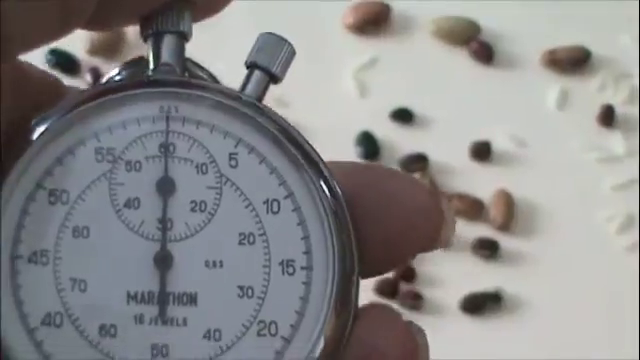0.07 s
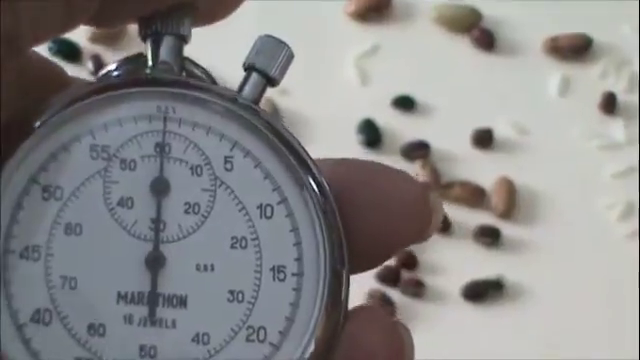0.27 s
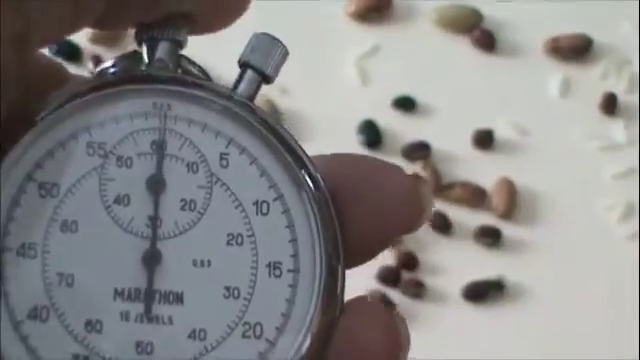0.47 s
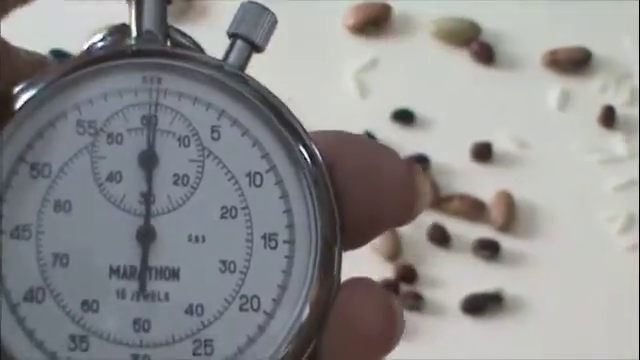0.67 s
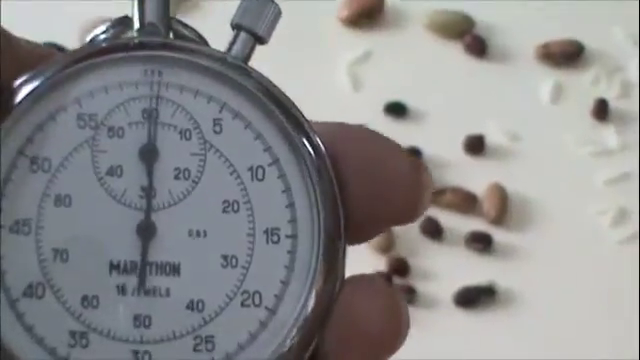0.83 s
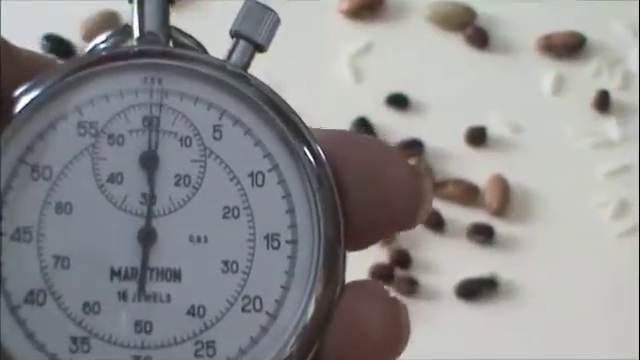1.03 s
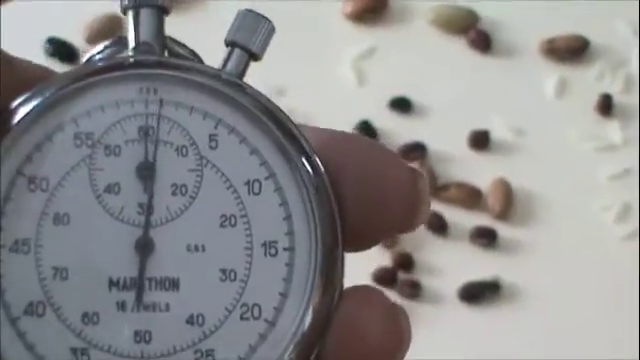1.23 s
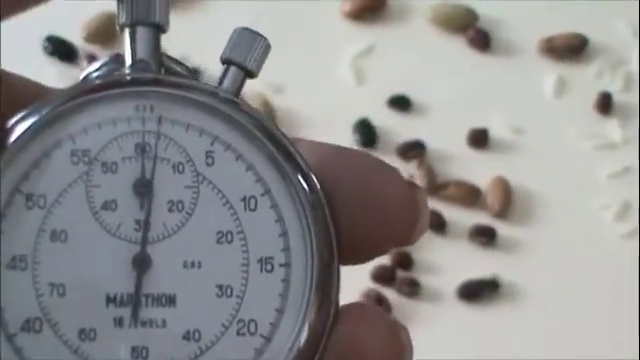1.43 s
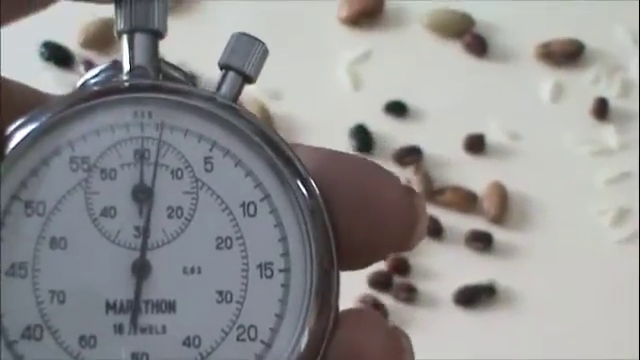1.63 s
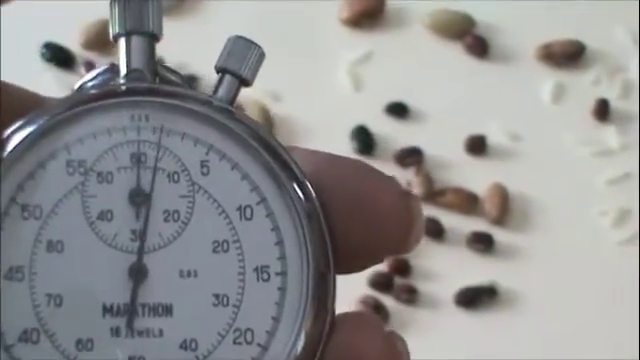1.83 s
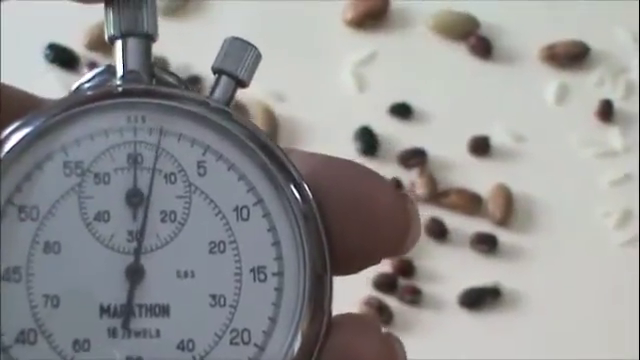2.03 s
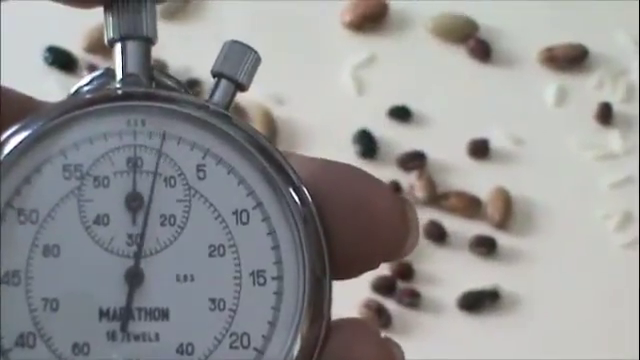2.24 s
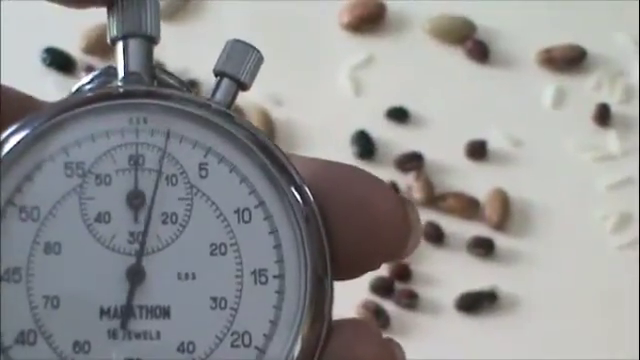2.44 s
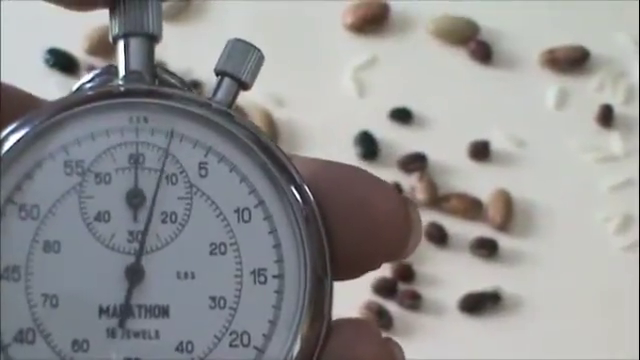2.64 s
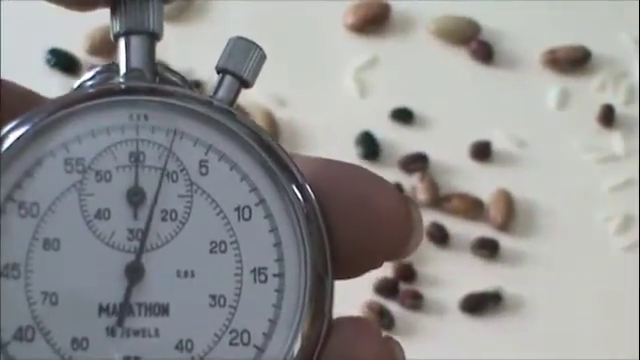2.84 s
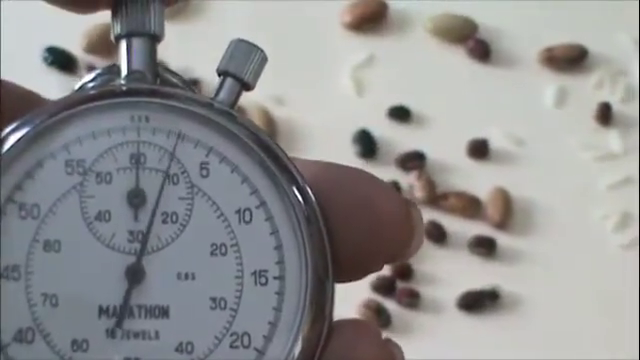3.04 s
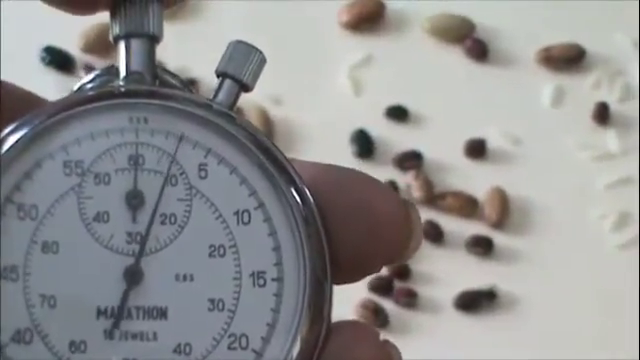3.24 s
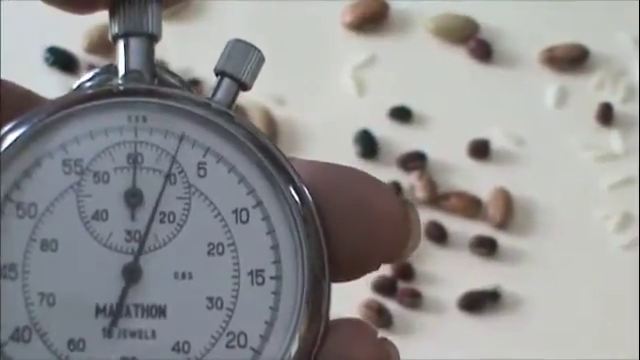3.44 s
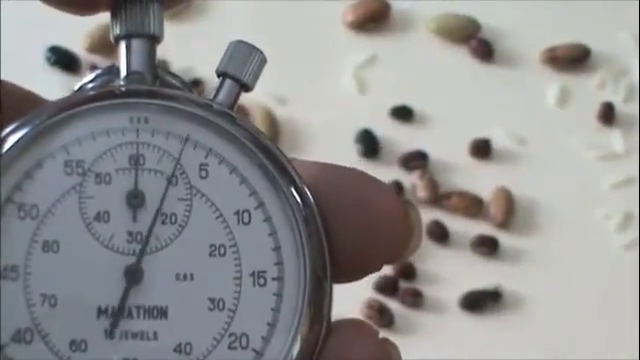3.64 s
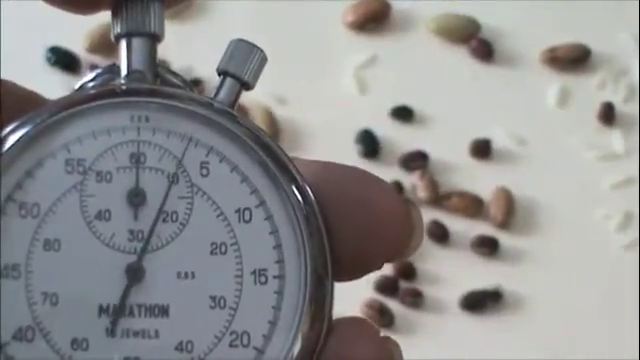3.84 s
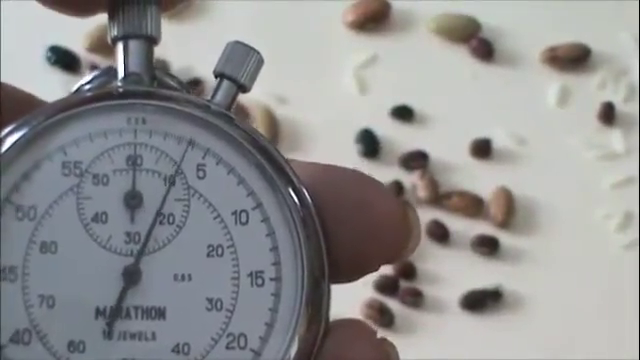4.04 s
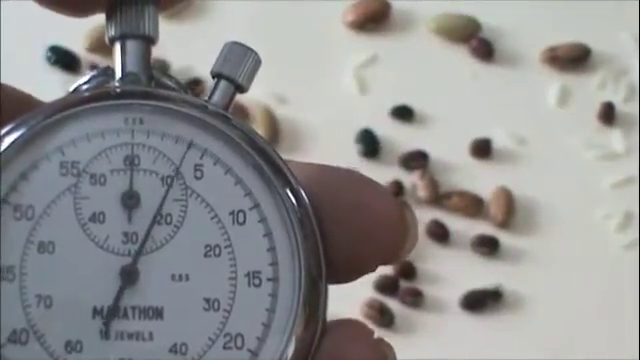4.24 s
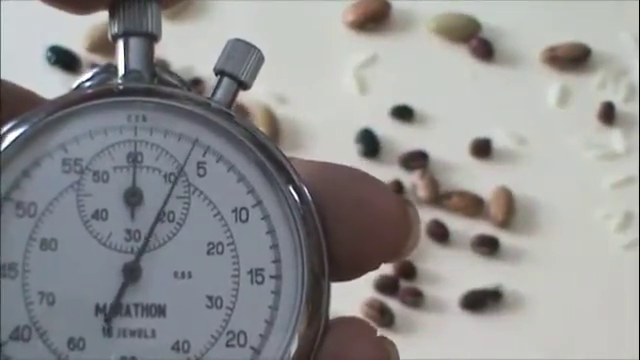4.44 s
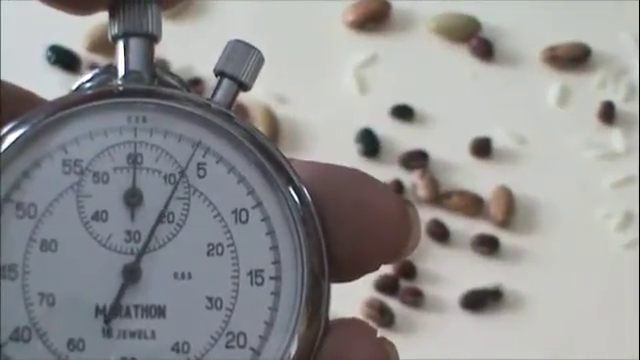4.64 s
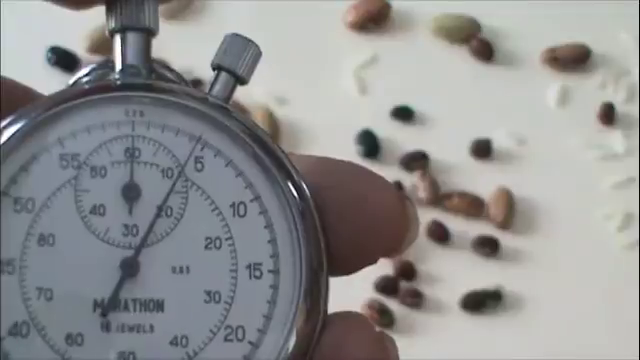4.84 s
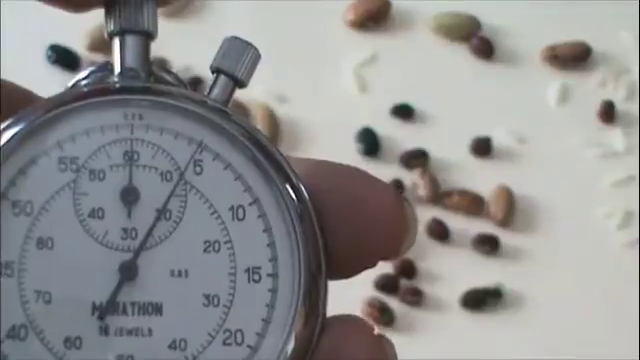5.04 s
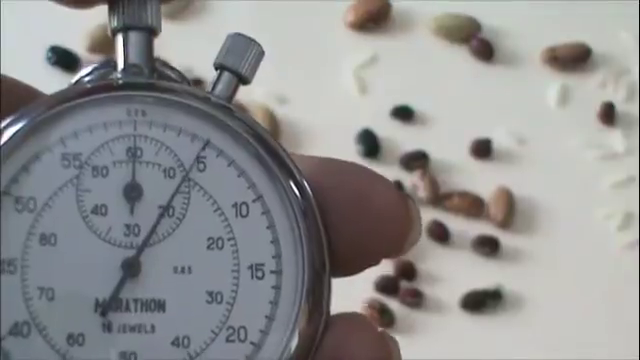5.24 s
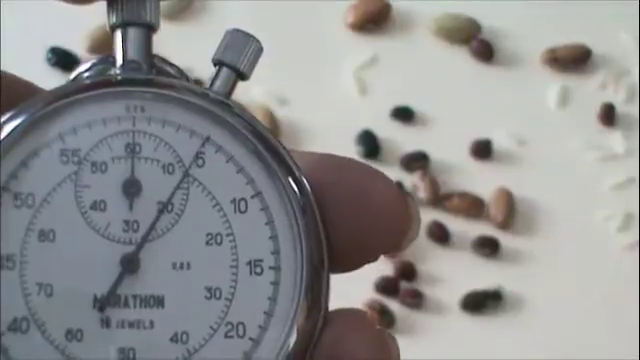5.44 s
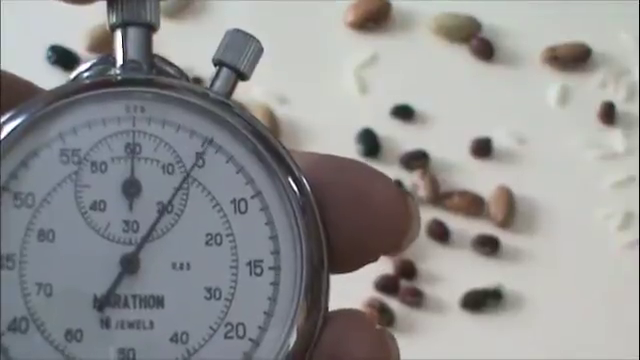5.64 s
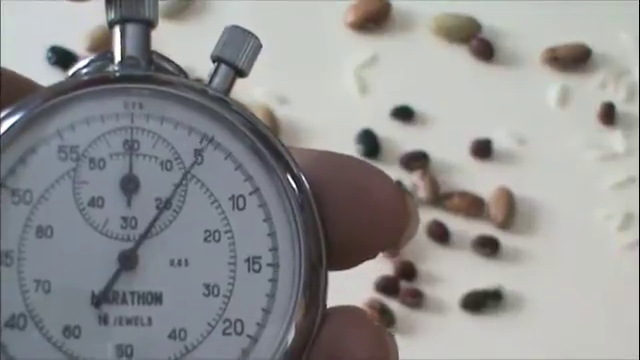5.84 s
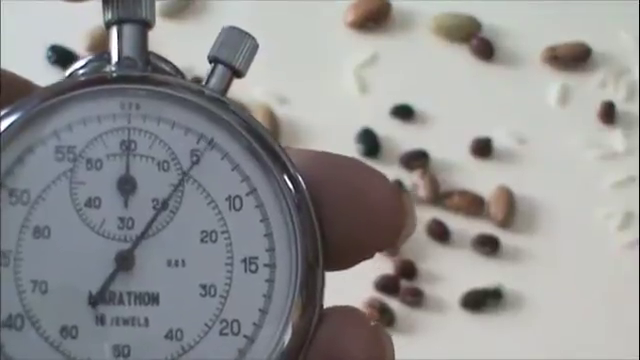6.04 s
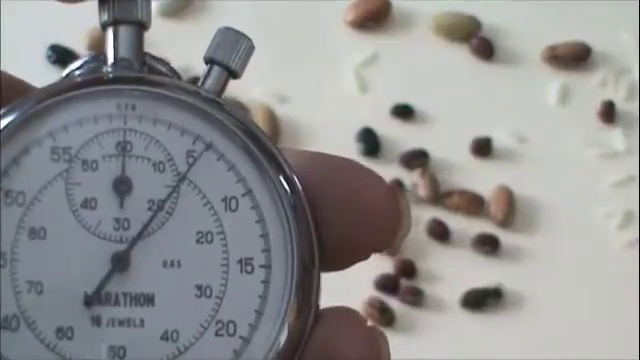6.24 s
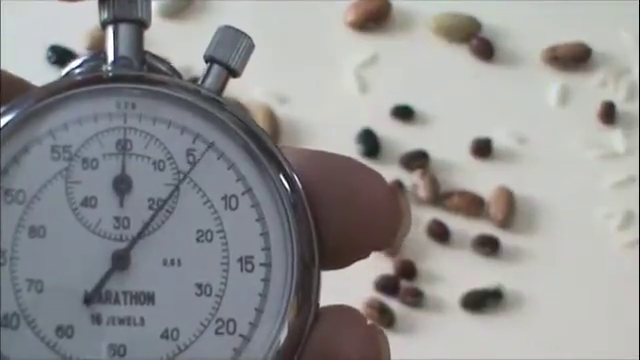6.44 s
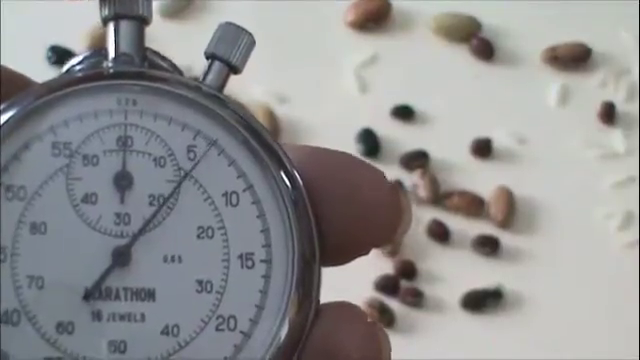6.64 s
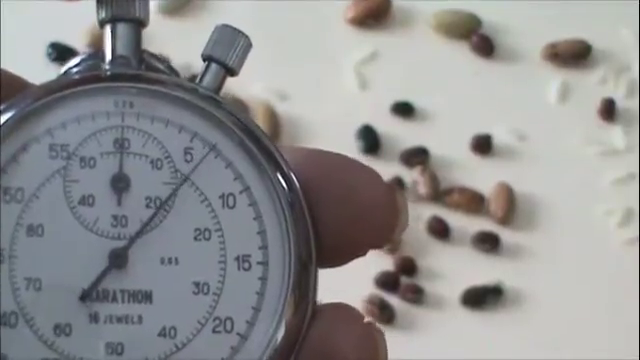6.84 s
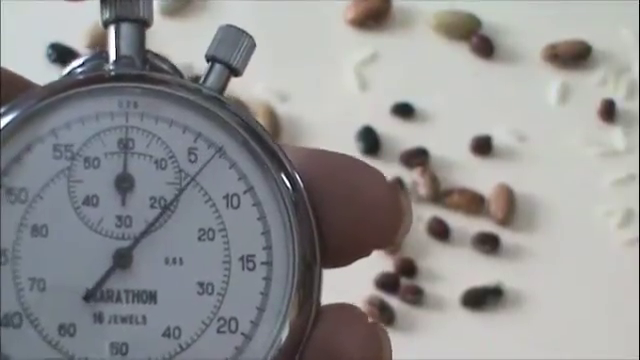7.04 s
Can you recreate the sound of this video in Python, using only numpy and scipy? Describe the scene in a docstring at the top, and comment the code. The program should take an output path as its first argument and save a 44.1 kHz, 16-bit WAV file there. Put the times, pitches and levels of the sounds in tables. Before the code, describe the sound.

In a quiet room, a faint focus motor buzzes briefly, then a hand presses a stopwatch's crown close to the microphone: hard metallic snaps with a bright spring ring. The mechanism starts and ticks on evenly, crisp, thin and rapid, in weak-strong pairs. Smaller clicks and finger slips continue until about two and a half seconds. Low appliance hum, a far engine and distant tyre noise lie underneath.

```python
"""Stopwatch started in the hand

A mechanical stopwatch is started close to a camera: the crown clicks (noise bursts ringing the case),
the springs ring (dying sines and shimmering noise), then the escapement ticks five times a second,
weak and strong in turn (bursts through resonances). The camera's focus motor steps faintly at first.
Appliances hum (wavering sines), a far engine drones (a gliding sine), tyres swell in the room's noise."""
import sys
import numpy as np
from scipy import signal
from scipy.fft import rfft, irfft, next_fast_len
from scipy.io import wavfile

SR = 44100
rng = np.random.default_rng(int(sys.argv[2]) if len(sys.argv) > 2 else 0)


def unload_audio(sound):
    """Save the sound as a 16-bit wav file, at the path given as the first command line argument."""
    columns = np.transpose(np.atleast_2d(sound))
    # keep every value between -1 and 1, then stretch to whole-number steps
    steps = np.round(np.clip(columns, -1, 1) * 32767)
    wavfile.write(sys.argv[1], SR, steps.astype(np.int16))


N = 313234
TIME = np.arange(N) / SR
TAPS = 4096  # length of the resonance and colour filters
BINS = np.fft.rfftfreq(TAPS, 1 / SR)

# resonances of the case, damped by the hand: centre_hz, width_hz, level_db
CASE_MODES = [(650, 170, -22), (1270, 140, -15.5), (2120, 1000, -10), (2767, 320, 1.5), (3500, 1300, -15.5),
              (4813, 260, 1), (6360, 810, -10.5), (7800, 860, -4), (8900, 390, 2), (9680, 400, 3.5),
              (11400, 970, -4.5), (13400, 990, -12), (15200, 1500, -19)]


def amp(db):
    """Decibels to gain."""
    return 10 ** (np.asarray(db) / 20)


def evened(x):
    """Scales to rms 1."""
    return x / np.sqrt(np.mean(x ** 2) + 1e-30)


def read_spectrum(points, hz):
    """Reads a spectrum table in dB on a log-frequency axis."""
    points_hz, value_db = np.transpose(points)
    return np.interp(np.log(hz + 1), np.log(points_hz), value_db)


def add(mix, start_s, sound):
    """Mixes a sound in at its start time."""
    part = mix[max(round(start_s * SR), 0):][:len(sound)]
    part += sound[:len(part)]


def drift(rate_hz, size=256):
    """Slow random wander of about rms 1: noise with its fast changes filtered away."""
    hz = np.fft.rfftfreq(size, TIME[-1] / size)
    spectrum = rfft(rng.standard_normal(size)) / (1 + (hz / rate_hz) ** 4)
    return np.interp(TIME, np.linspace(0, TIME[-1], size), evened(irfft(spectrum)))


def causal(gain):
    """The sharpest (minimum-phase) impulse response that has this gain at each frequency."""
    log_gain = np.log(np.maximum(gain, gain.max() * 1e-5))
    circle = np.concatenate([log_gain, log_gain[-2:0:-1]])
    return np.fft.ifft(np.exp(np.conj(signal.hilbert(circle)))).real


def body(modes):
    """Gain of a set of resonances with steep skirts."""
    power = np.zeros(len(BINS))
    for hz, width_hz, db in modes:
        detune = (BINS ** 2 - hz ** 2) / ((BINS + 1) * width_hz)
        power += amp(db) ** 2 / (1 + detune ** 2) ** 1.28
    return np.sqrt(power)


def chatter(decay_s, size=1024):
    """A metal contact swells and chatters briefly: an even-spectrum burst of energy 1."""
    u = (np.arange(size) + 1) / SR / decay_s
    fade = (1 - np.exp(-3 * u)) * np.exp(-u)
    burst = rng.standard_normal(size)
    for _ in range(5):  # flatten the spectrum and reshape the fade in turn
        phase = np.angle(rfft(burst * fade))
        burst = irfft(np.exp(1j * phase)) * np.sqrt(fade)
    return burst / np.linalg.norm(burst)


def tail(colour, t60, side_db):
    """A dense dying response for two channels: fading noise, of energy 1 before its colour."""
    t = np.arange(SR) / SR
    fade = amp(-60 * t / t60) * (1 - np.exp(-t / 0.00042))
    noise = rng.standard_normal((2, SR)) * fade
    noise /= np.linalg.norm(noise, axis=1, keepdims=True)
    colour_filter = causal(amp(read_spectrum(colour, BINS)))
    mid, side = signal.fftconvolve(noise, colour_filter[None], axes=1)[:, :SR]
    return np.array([mid + amp(side_db) * side, mid - amp(side_db) * side])


def through(x, response):
    """Plays a mono sound through a two-channel response."""
    size = next_fast_len(N + SR, True)
    return irfft(rfft(x, size) * rfft(response, size), size)[:, :N]


def air(tyre_hz=960, tyre_width_hz=110):
    """Steady room noise, narrow in the bass and wide in the middle, with far tyres swelling in it."""
    # room air and microphone hiss: pitch_hz, density_db (per Hz)
    air_colour = [(20, -103), (60, -92.5), (80, -96), (190, -88), (340, -87.5), (520, -93.5), (1000, -96),
                  (1250, -99.5), (1650, -101.5), (2200, -106), (4200, -108.5), (6200, -106.5), (7600, -109),
                  (9200, -106.4), (11500, -109.3), (16000, -109.5)]
    # stereo width: pitch_hz, side_minus_mid_db
    stereo_width = [(60, -27.5), (110, -22.5), (200, -14), (380, -10), (700, -4), (1290, -0.5), (2380, 4.5),
                    (4400, 0.5), (8120, -3.5), (15000, -43.5)]
    # far tyre noise: time_s, level_db
    tyre_swells = [(0, -84), (2.2, -72), (3.5, -81.5), (5.5, -73), (6.7, -77), (6.95, -66.5), (7.1, -66.5)]
    size = next_fast_len(N, True)
    hz = np.fft.rfftfreq(size, 1 / SR)
    mid_side_gain = np.array([np.ones(len(hz)), amp(read_spectrum(stereo_width, hz))])
    white, rolling = rfft(rng.standard_normal((2, 2, size))) * mid_side_gain
    floor = irfft(white * amp(read_spectrum(air_colour, hz)) * np.sqrt(SR / 2), size)[:, :N]
    tyre_band = 1 / (1 + ((hz - tyre_hz) / tyre_width_hz) ** 2)
    tyres = evened(irfft(rolling * tyre_band, size)[:, :N])
    mid, side = floor + tyres * amp(np.interp(TIME, *np.transpose(tyre_swells)))
    return np.array([mid + side, mid - side])


def appliances(waver=0.069, waver_turns=0.017):
    """Appliance tones: sines whose level and phase waver a little."""
    # tones of the appliances: pitch_hz, level_db (rms)
    hum_tones = [(47.3, -84), (59.2, -74), (66.2, -71.5), (94.5, -75), (118.4, -77.5), (141.9, -70.5),
                 (189.1, -61.5), (236.5, -64.5), (260.5, -81.5), (283.7, -90), (296, -77), (378.3, -79.5),
                 (391, -81.5), (425.5, -79), (15734, -85.5)]
    tones = np.zeros(N)
    for hz, db in hum_tones:
        level = amp(db) * (1 + waver * drift(1.2))
        turns = hz * TIME + rng.random() + waver_turns * drift(1.59)
        tones += level * np.sin(2 * np.pi * turns)
    return np.sqrt(2) * tones  # rms to peak


def far_engine():
    """One gliding sine: the engine climbs slowly, then shifts down in pitch and settles near 118 Hz."""
    # course of the drone: time_s, pitch_hz, level_db (rms)
    drone_course = [(0, 121.6, -61), (0.6, 125.8, -66), (2.1, 131.1, -64.5), (3.2, 133.7, -60),
                    (3.75, 113, -66.5), (5, 116.3, -68), (5.4, 118.1, -60), (7.1, 117.8, -65)]
    s, hz, db = np.transpose(drone_course)
    turns = np.cumsum(np.interp(TIME, s, hz)) / SR
    return np.sqrt(2) * amp(np.interp(TIME, s, db)) * np.sin(2 * np.pi * turns)


def focus_motor(settle_s=0.0058, settle_db=-8, uneven_db=2.0):
    """The lens moves one step a frame and settles just after, ringing the camera's shell."""
    # runs of the motor: start_s, end_s, level_db
    motor_runs = [(0.0156, 0.40, -25), (1.185, 2.24, -24.5)]
    # resonances of the shell: centre_hz, width_hz, level_db
    shell_modes = [(1774, 170, -1.5), (2344, 43, 6), (2980, 200, -9.5), (3550, 78, -1.5), (4760, 85, 2),
                   (6030, 340, -6.5), (6900, 120, -3), (9700, 990, -14)]
    step_s = 1 / 29.97  # one frame
    steps = np.zeros(N)
    for start, end, db in motor_runs:
        for s in np.arange(start, end, step_s):
            size = amp(db + uneven_db * rng.standard_normal())
            add(steps, s, size * chatter(0.0018))
            add(steps, s + settle_s, size * amp(settle_db) * chatter(0.0015))
    return signal.oaconvolve(steps, causal(body(shell_modes)))[:N]


def handling(slip_s=0.002):
    """The case shifts in the fingers: soft slips of the grip knock it, faint and dull."""
    # slips: start_s, level_db
    grip_slips = [(0.03, -45), (0.117, -46), (1.2204, -42), (1.4494, -42.5), (1.7764, -44)]
    # their dull colour: pitch_hz, gain_db
    slip_colour = [(1970, 30.5), (2670, 20.5), (4700, 15), (9000, 9)]
    slips = np.zeros(N)
    for s, db in grip_slips:
        add(slips, s, amp(db) * chatter(slip_s))
    dull_case = body(CASE_MODES) * amp(read_spectrum(slip_colour, BINS))
    return signal.oaconvolve(slips, causal(dull_case))[:N]


def spring_tones(tones_db=-47.0, spread_turns=0.12):
    """The coiled springs ring on in close, beating tones, their phases spread between the channels."""
    # long tones of the springs: pitch_hz, level_db (against tones_db), t60_s
    ring_tones = [(2390, -19, .65), (2700, -4, 0.21), (2730, -5, 0.28), (2940, -9, 0.32), (4741, -6, .3),
                  (4789, -4, .38), (4832, -6, .5), (5200, -22, 0.45), (5640, -26, .25), (6300, -19, .3),
                  (6600, -8.5, .45), (7040, -12, 0.3), (8581, -7, 0.35), (9100, -19, 0.49), (9650, -25, .6),
                  (9800, -10, 0.24), (11750, -15, 0.203), (13460, -17, .28)]
    t = np.arange(SR) / SR
    ringing = np.zeros((2, SR))
    for hz, db, t60 in ring_tones:
        phase_turns = rng.random() + spread_turns * rng.standard_normal((2, 1))
        ringing += amp(tones_db + db - 60 * t / t60) * np.sin(2 * np.pi * (hz * t + phase_turns))
    return ringing


def crown():
    """Each lever touches, then seats, knocking the case and jolting the springs; gives case and ringing."""
    # clicks of crown and levers: start_s, level_db, then tone against that level: thump_db, knock_db,
    # ping_db, clack_db; then seat_db (against first touch), and shares sent to the springs:
    # shimmer_db, tones_db
    lever_clicks = [(0.339, -3, 10, 11, -11, -10, -6, -35, -45), (0.4277, 12, 2, 0, -1, 1, -5, -3.5, -1),
                    (0.651, -21, 0, 4, 0, -2, -13.5, -21, -25), (0.671, -18, 6, -4, 1, -7, 2, -13, -23),
                    (0.6775, 7.5, -8.5, 3.5, -4, 4.5, -0.5, -13.5, -29),
                    (0.753, -17, -5, -10, 7, 11, -8, -11, -24), (1.133, -28, 0, -4, 6, 12, -12, -16, -17),
                    (1.1797, -7.5, 1.5, -9, 4, -14, 5, -8, -9),
                    (1.7514, -10, 0, -4.5, -5, -11, -8, -11, -6),
                    (2.234, -20.5, 7, -4, -6, 12.5, -8, -22, -30),
                    (2.393, -25, 16, 10, 13.5, 3, -9, -7, -13), (2.399, -23, 4, -2, 4, 1, -12, -18, -15)]
    # centres of thump, knock, ping, clack, the click's own level, and fizz: pitch_hz
    tone_centres = [1940, 2620, 4700, 6200, 9050, 13900]
    # hollow pock of the stem: centre_hz, width_hz, level_db
    stem_modes = [(1340, 103, 7.1)]
    # dense shimmer of the springs: pitch_hz, gain_db
    shimmer_colour = [(200, -44.5), (550, -22), (1300, -16.5), (2000, -15.5), (2750, -4.5), (3800, -21.5),
                      (4800, -3.5), (6000, -15.5), (7000, -9.5), (7700, -22.5), (9000, -11.5),
                      (12000, -22.5), (13500, -22.5), (16000, -32)]
    touch_s, seat_s = 0.001135, 0.0022  # decay of the chatter, and delay of the seating blow
    fizz_base_db, fizz_per_db = -7.5, 0.72  # harder clicks are brighter
    release_s = 0.6785
    case, shake, pluck = np.zeros((3, N))
    case_gain = body(CASE_MODES)
    for s, db, thump, knock, ping, clack, seat_db, shimmer_db, tones_db in lever_clicks:
        fizz = fizz_base_db + fizz_per_db * db
        points = list(zip(tone_centres, [thump, knock, ping, clack, 0, fizz]))
        tone = amp(db + read_spectrum(points, BINS))
        jolt, case_ring = causal(tone), causal(tone * case_gain)
        add(case, s, signal.fftconvolve(chatter(touch_s), case_ring))
        add(case, s + seat_s, amp(seat_db) * signal.fftconvolve(chatter(touch_s), case_ring))
        add(shake, s + touch_s, amp(shimmer_db) * jolt)
        add(pluck, s + touch_s, amp(tones_db) * jolt)
    add(case, release_s, causal(body(stem_modes)))  # the crown springs back against its stop
    shimmer = through(shake, tail(shimmer_colour, t60=0.87, side_db=-6))
    return case, shimmer + through(pluck, spring_tones())


def beats(uneven_db=1.8):
    """The balance swings evenly, its beats weak and strong in turn: start_s, level_db, weak (0 or 1)."""
    # level of the strong beats as the watch sways in the hand: time_s, level_db
    hand_sway = [(0.7, -16.5), (2.6, -15.5), (4.15, -11.5), (5.3, -12), (6.2, -13.5), (7.1, -15.5)]
    first_beat_s, beat_s = 0.7263, 0.200405
    weak_early_s, weak_db = 0.001, -10
    swings = np.arange(first_beat_s, TIME[-1], beat_s)
    weak = 1 - np.arange(len(swings)) % 2
    sway_db = np.interp(swings, *np.transpose(hand_sway))
    db = sway_db + weak_db * weak + uneven_db * rng.standard_normal(len(swings))
    return zip(swings - weak_early_s * weak, db, weak)


def escapement(rub_db=-29, weak_rub_db=5, rub_lead_s=0.017, bounce_s=0.0018, bounce_db=-7, uneven_db=0.5):
    """Each beat: the pallet slides off a tooth, the next tooth drops onto it and bounces once."""
    # what the escapement rings with: centre_hz, width_hz, level_db
    escapement_modes = [(5340, 3400, -22.5), (7880, 360, -8), (8900, 360, -6.5), (9540, 350, -1.5),
                        (10700, 450, -7), (13150, 400, -15)]
    # the plate that carries the balance: centre_hz, width_hz, level_db
    plate_modes = [(2825, 39, -19), (2975, 33, -18.5), (3240, 71, -23.5)]
    blows, nudges = np.zeros((2, N))
    for s, db, weak in beats():
        rub, nudge = amp(uneven_db * rng.standard_normal(2))
        rub = rub * amp(weak * weak_rub_db)  # weak beats rub more
        unlock = s - rub_lead_s + rng.uniform(-0.0012, 0.002)
        add(blows, unlock, amp(rub_db) * rub * chatter(0.0039))
        add(blows, s, amp(db) * chatter(0.0012))
        add(blows, s + bounce_s * rng.uniform(1.0, 1.6), amp(db + bounce_db) * chatter(0.0013))
        # slide and drop both nudge the plate
        add(nudges, unlock, amp(-8.5) * rub * chatter(0.0035))
        add(nudges, s - 0.002, amp(-2.5 * weak) * nudge * chatter(0.0046))
    ticks = signal.oaconvolve(blows, causal(body(escapement_modes)))[:N]
    plate = signal.oaconvolve(nudges, causal(body(plate_modes)))[:N]
    return ticks + plate


def scene():
    """The watch is close and nearly central; the room answers it faintly."""
    # the room's answer: pitch_hz, gain_db
    room_colour = [(300, -16), (1000, -21), (2100, -11.5), (2750, -12.5), (4000, -10), (6000, -10.5),
                   (9500, -21.5), (16000, -26)]
    background = (air() + appliances() + far_engine()) * amp([[-0.15], [0.15]])
    case, ringing = crown()
    watch = case + handling() + escapement()
    near = (watch + ringing) * amp([[0.4], [-0.4]])
    room = through(watch, tail(room_colour, t60=0.28, side_db=-1.5))
    return background + focus_motor() + near + room


def record(dry):
    """The recorder's band limit: a steep low-pass."""
    edge_hz = 15950
    low_pass = signal.firwin(511, edge_hz, window=("kaiser", 9), fs=SR)
    return signal.oaconvolve(dry, low_pass[None], "same", axes=1)


dry = scene()
out = record(dry)
unload_audio(out)
```